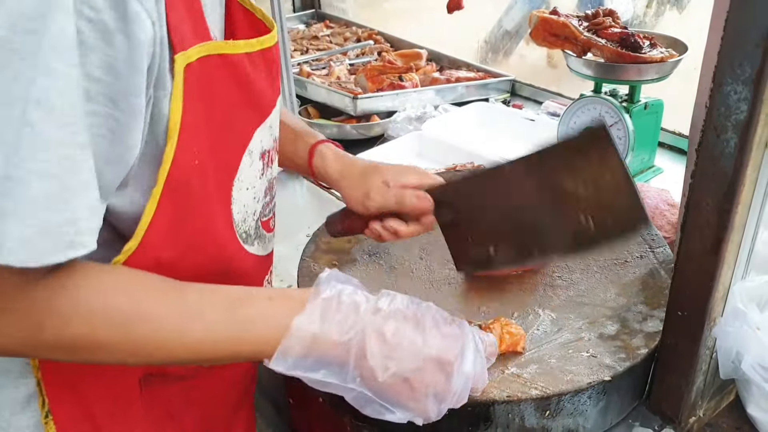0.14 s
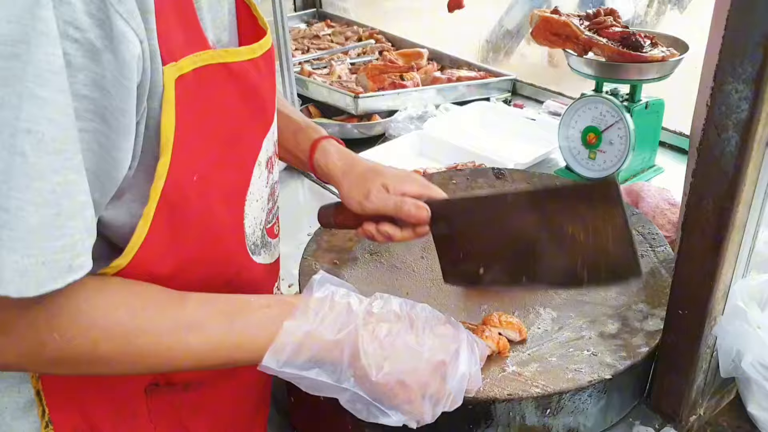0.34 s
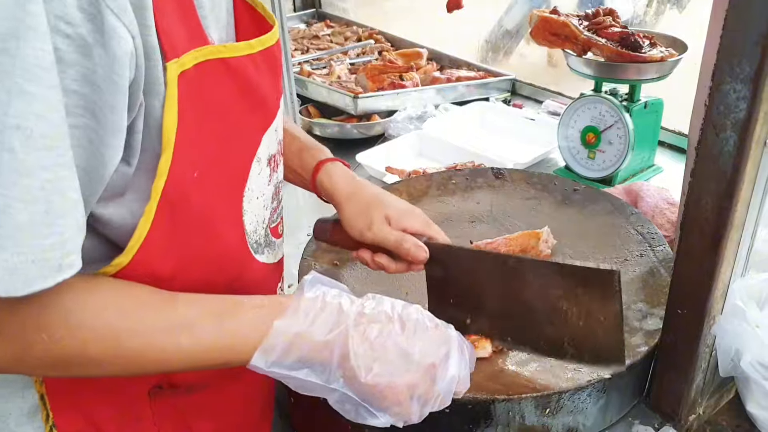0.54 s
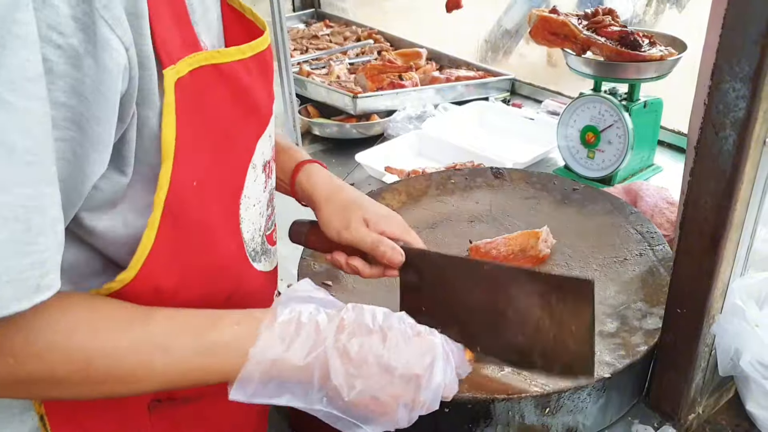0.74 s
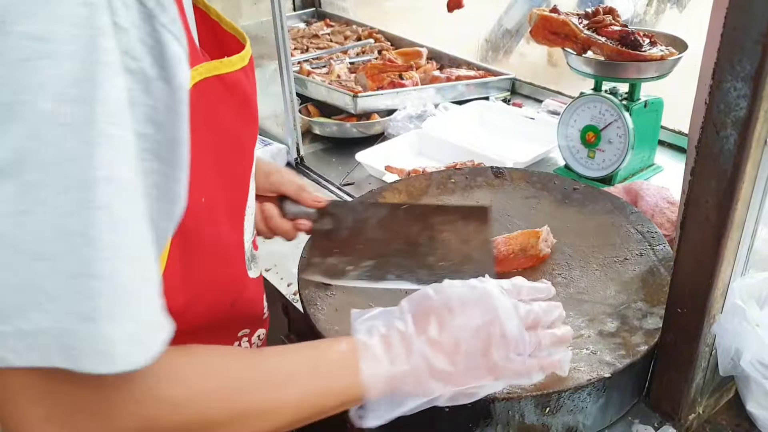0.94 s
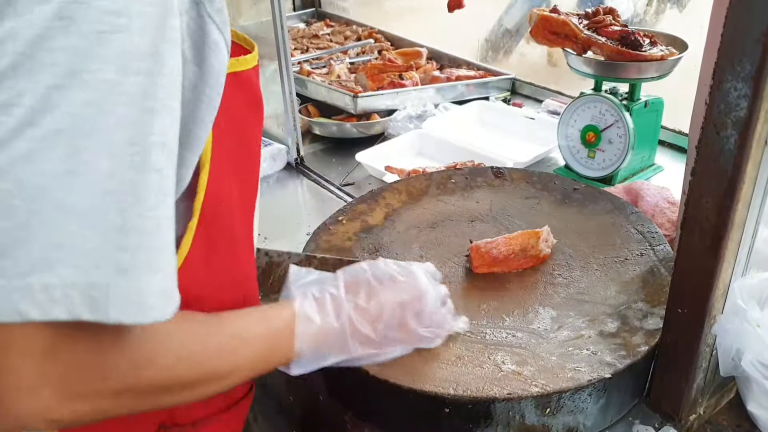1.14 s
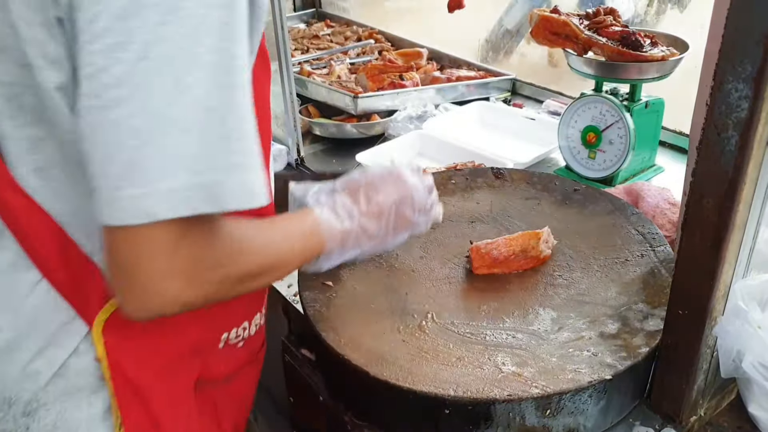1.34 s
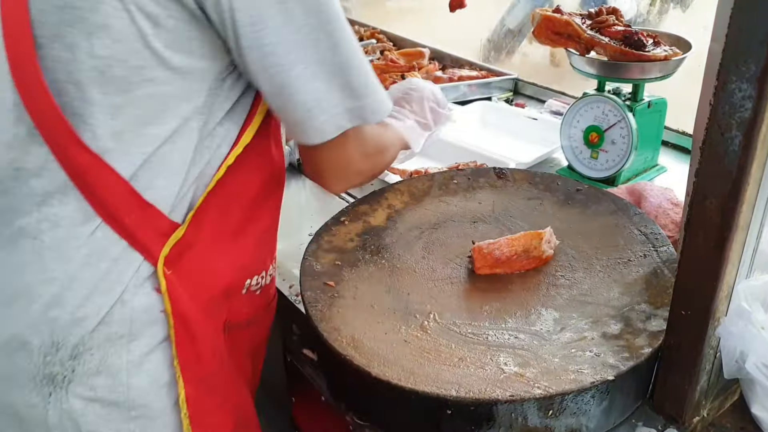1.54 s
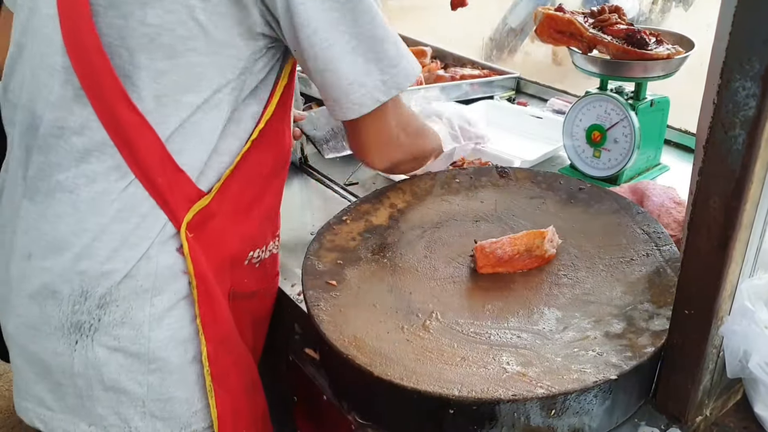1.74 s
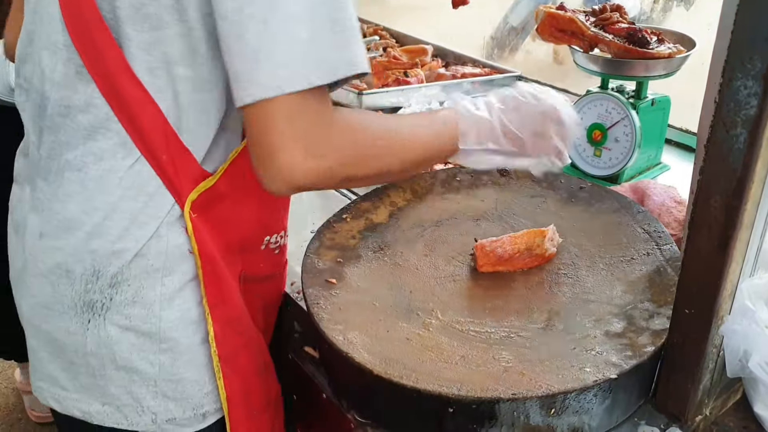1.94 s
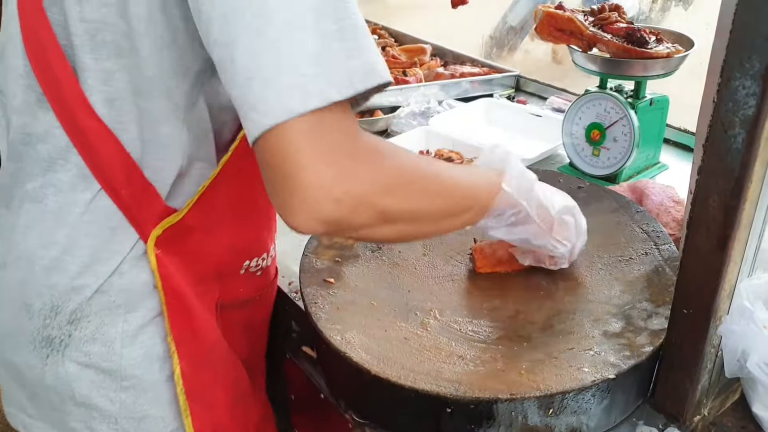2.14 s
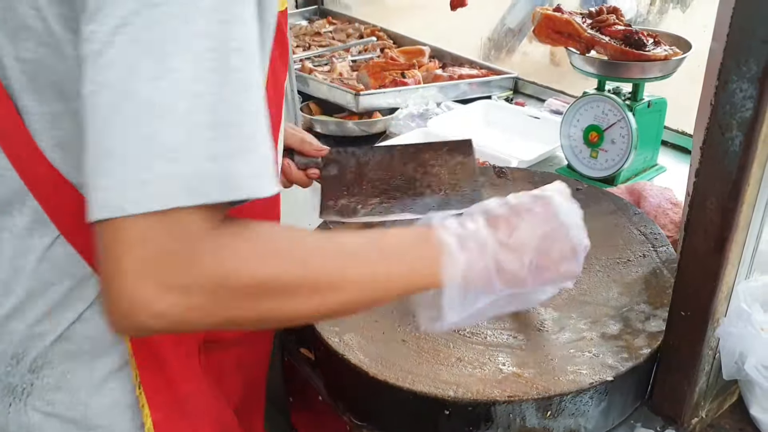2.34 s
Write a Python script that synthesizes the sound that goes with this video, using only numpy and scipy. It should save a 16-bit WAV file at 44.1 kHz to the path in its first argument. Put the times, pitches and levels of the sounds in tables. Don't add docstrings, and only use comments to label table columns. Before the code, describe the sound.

Three heavy cleaver chops thud through crackling meat on wood, followed by scraping and tray knocks

```python
import sys
import numpy as np
from scipy import signal
from scipy.fft import rfft, irfft, next_fast_len
from scipy.io import wavfile
from scipy.ndimage import uniform_filter1d, map_coordinates

SR = 44100
rng = np.random.default_rng(int(sys.argv[2]) if len(sys.argv) > 2 else 0)


def bounce(signal):
    frames = np.transpose(np.atleast_2d(signal))
    limited = np.clip(frames, -1, 1)
    pcm = np.round(limited * 32767).astype(np.int16)
    wavfile.write(sys.argv[1], SR, pcm)


def boost(x):
    u = np.asarray(x, float) / 20
    return 10 ** u


N = 110250
T = np.arange(N) / SR

# f/Hz, density/dB per Hz
HISS_SPECTRUM = [(150, -70), (250, -7), (800, -5.5), (2050, -7.5), (3400, -14.5), (6000, -16),
                 (9000, -20.5), (16000, -24.5)]
TRAFFIC_SPECTRUM = [(15, -39), (28, -7), (50, 2), (118, 3.5), (146, -7), (211, -11), (257, -14), (400, -28),
                    (880, -120)]
# t/s, level/dB
HISS_LEVEL = [(0.0, -47.5), (0.2, -53.5), (0.28, -34.5), (0.4, -43.5), (0.54, -43), (1.08, -49),
              (1.22, -49), (1.5, -50), (1.86, -47.5), (2.04, -50.5), (2.28, -51.5), (2.5, -49)]
# f/Hz, correlation/1
FAR_LIKENESS = [(60, 0.85), (240, 1), (950, -0.32), (3770, 0.045), (15000, -0.22)]
NEAR_LIKENESS = [(60, 1), (240, 0.85), (950, 0.67), (3770, -0.28), (15000, 0.45)]
# peak t/s, dull level/dB, crisp level/dB, rise/s, fall/s
RUSTLES = [(0.129, -51.5, -57, .067, 0.064), (0.929, -49, -49.5, 0.039, 0.02),
           (1.008, -50.5, -39.5, 0.024, 0.036), (1.08, -72, -52.5, 0.034, 0.036),
           (1.21, -48, -50.5, 0.2, 0.056), (1.5, -54, -61, 0.21, 0.048), (1.701, -44, -46.5, 0.032, 0.042),
           (1.79, -47.5, -62, 0.039, 0.025), (1.888, -53, -56, 0.012, 0.21),
           (2.153, -44, -47.5, 0.057, 0.056), (2.31, -57, -54, 0.045, 0.036),
           (2.395, -44, -54, 0.052, 0.045), (2.48, -48.5, -55, 0.023, 0.044)]
# t/s, level/dB
SNAPS = [(.984, -43), (1.004, -47), (1.015, -33.5), (1.036, -36), (1.069, -52.5), (1.425, -51),
         (1.487, -48), (2.265, -43), (2.27, -42), (2.279, -43), (2.287, -52), (2.317, -59), (2.47, -46)]
# f/Hz, density/dB per Hz
DULL_SPECTRUM = [(300, -31), (700, -7), (2000, -0.5), (3300, -6.5), (5000, -5), (7000, -14), (10000, -29),
                 (16000, -40)]
CRISP_SPECTRUM = [(1500, -61), (3500, 0), (5200, -2.5), (8000, -2.5), (12000, -4.5), (16000, -7)]
# peak t/s, level/dB, rise/s, fall/s
RUBS = [
    (0.931, -38.5, 0.012, 0.056),
    (1.069, -42.5, 0.08, 0.057),
    (1.62, -48, 0.18, 0.21),
    (2.119, -38.5, 0.055, 0.069),
    (2.209, -39.5, 0.043, 0.047),
    (2.309, -44.5, 0.056, 0.11),
]
# start t/s, length/s, f/Hz, level/dB
SQUEALS = [
    (.87, .22, 2160, -53),
    (1.62, .2, 2100, -58),
    (2.237, .07, 2200, -53),
    (2.215, .04, 4000, -58.5),
    (2.355, .055, 2300, -57),
]
# t/s, f/Hz, level/dB, t60/s
BUMPS = [
    (.08, 293.5, -39, 0.17),
    (.33, 630, -24, .15),
    (0.56, 151, -12, 0.14),
    (.6, 149, -40, 0.089),
    (.85, 130, -26, 0.13),
    (.92, 610, -26, 0.062),
    (1.685, 690, -33, 0.065),
    (2.47, 540, -42.5, .15),
]
# t/s, level/dB, chatter length/s, clank level/dB
KNOCKS = [
    (2.0746, -35, .0002, -7),
    (2.1012, -30, .002, -2),
    (2.1380, -31, .025, 1),
]
# f/Hz, t60/s, level/dB at knocks 1, 2, 3
TRAY_MODES = [(277, 0.14, -7, 3.5, -3), (645.5, 0.1, 3.5, 9, -6.5), (733, 0.069, -14, 0, 2.5),
              (967, 0.2, -3.5, -3, -4), (1452, 0.13, -7, -4.5, -4), (1645, 0.037, 1, -13, -1),
              (2250, 0.037, -22, -0.5, 0), (2510, 0.17, -12, -13, -2.5), (2765, 0.23, -4.5, -21, -7.5),
              (2930, 0.072, -28, -17, -7), (3144, 0.12, -25, -21, -15), (3970, 0.074, -31, -9, -4),
              (5390, .15, -34, -19, -16.5), (6250, 0.18, -32, -18.5, -32)]
# f/Hz, density/dB per Hz
CLANK_SPECTRUM = [(150, -23), (300, -35), (700, -3), (1500, 5), (3000, 10), (4500, -27), (7000, -27),
                  (16000, -46)]
# t/s, block level/dB, skin level/dB, tail level/dB, drum level/dB
CHOPS = [
    (.2340, -8, -24, -10, -14),
    (.4938, -3.5, -26.5, -8.5, -15),
    (.7288, -10.5, -17, -17, -19),
]
# f/Hz, t60/s, level/dB at chops 1, 2, 3
BLOCK_MODES = [(278, 0.095, 7.5, 3.5, 2), (408, 0.071, -5, -5, -33), (462, 0.17, -5, -24, -8),
               (559.5, 0.13, -1.5, 2.5, 7), (751, 0.14, -2.5, -30, -11), (958, 0.38, -47, -6, -14),
               (1190, 0.018, -7, 6.5, 5.5), (1515, 0.029, 1.5, 0, -3), (1665, 0.065, -13.5, -2.5, -12.5),
               (2194, 0.055, -24, -8.5, -11), (3030, 0.043, -23, -11.5, -36)]
# f/Hz, level/dB, t60/s
DRUM_MODES = [(68, -1.5, 0.37), (94, 4.5, 0.23), (128.4, -6.5, 0.54)]
BLADE_MODES = [(3870, 8, 0.015), (5260, 1, 0.037)]
# f/Hz, density/dB per Hz
SKIN_SPECTRUM = [(1180, -38), (2000, -16), (5160, -1), (7310, -6), (12700, -11), (13800, -5), (16000, -14)]
SLAP_SPECTRUM = [(100, -39), (200, -22), (300, -0.5), (600, 4.5), (1100, -8), (2000, -17), (5000, -25),
                 (16000, -39)]
SHAKE_SPECTRUM = [(35, -14), (70, -4), (125, -6), (190, -10), (250, -11.5), (600, -20.5), (1200, -26),
                  (16000, -55.5)]
# f/Hz, t60/s
SLAP_T60 = [(100, 0.22), (400, 0.23), (1500, 0.19), (5000, 0.23), (15000, 0.31)]
# f/Hz, level/dB
MIC_RESPONSE = [(4000, 0), (6300, 1.5), (8200, -4), (9500, -1.5), (11500, 3.5), (14000, -0.5), (16000, 0.5)]
MIC_LEAN = [(60, -3.5), (180, -4), (550, -1.5), (1650, -3.5), (4970, -7.5), (15000, 3.5)]

TRAFFIC_DB, SURGE_DB = -42.5, 1.5
SQUEAL_WAVER_HZ, SQUEAL_STUTTER_DB = 75, 3
CLICK_DB, CLANK_DB, CLANK_T60_S = 12, -0.5, 0.16
MUTED_S, MUTE_FALL_S = 2.178, .02
SETTLE_S, SETTLE_DB = 2.15, -26.5
FORCE_PEAK_S, FREE_RING_S, DAMP_FALL_S = .0018, .012, .007
DAMPED_SHARE = 0.28
DRUM_LAG_S, DRUM_RISE_S = .0005, .022
SHELL_HZ, SHELL_DB, SHELL_T60_S = 249.6, -9, 0.59
SKIN_RISE_S, SKIN_FALL_S, BLADE_DB = .0015, .0032, -7
SLAP_DB, SLAP_RISE_CYCLES = -1, 8
SHAKE_DB, SHAKE_T60_S = -12.5, 1.21


def unit(x):
    return x / np.sqrt(np.mean(x ** 2) + 1e-20)


def along(points, hz):
    f, v = np.transpose(points)
    return np.interp(np.log(hz + 1), np.log(f + 1), v)


def wobble(rate_hz):
    knots = rng.standard_normal(int(N * rate_hz / SR) + 4)
    return map_coordinates(knots, [T * rate_hz])


def filtered(x, response):
    m = next_fast_len(N + SR // 2)
    return irfft(rfft(x, m) * response(np.fft.rfftfreq(m, 1 / SR)), m)[..., :N]


def rush(spectrum, likeness, field=lambda hz, t: 1, patchy_db=0):
    def mid_side(hz):
        angle = np.arccos(np.clip(along(likeness, hz), -1, 1)) / 2
        return boost(along(spectrum, hz)) * np.array([np.cos(angle), np.sin(angle)])

    mid, side = filtered(rng.standard_normal((2, N)), mid_side)
    stereo = unit(np.array([mid + side, mid - side]))
    hz, t, z = signal.stft(stereo, SR, nperseg=128)
    patch = uniform_filter1d(rng.standard_normal(z.shape[1:]), size=3, axis=0)
    patch = unit(uniform_filter1d(patch, size=30, axis=1))
    z = z * field(hz[:, None], t) * boost(patchy_db * patch)
    return signal.istft(z, SR, nperseg=128)[1][:, :N]


def dying(t, t60_s, rise_s):
    t = np.maximum(t, 0)
    return (1 - np.exp(-t / rise_s)) * boost(-60 * t / t60_s)


def ring(start_s, modes, rise_s=0.00036, crest_s=None):
    t = T[:N - round(start_s * SR)]
    out = np.zeros(len(t))
    for hz, db, t60_s in modes:
        if crest_s is None:
            wave = np.sin(2 * np.pi * hz * t)
        else:
            wave = np.cos(2 * np.pi * hz * (t - crest_s))
        out += boost(db) * dying(t, t60_s, rise_s) * wave
    return np.pad(out, (N - len(t), 0))


def hump(peak_s, rise_s, fall_s):
    return np.exp(-((T - peak_s) / np.where(T < peak_s, rise_s, fall_s)) ** 2)


def hold(end_s, fall_s):
    return hump(end_s, 9, fall_s)


def street():
    hiss_db = np.interp(T, *np.transpose(HISS_LEVEL)) - 1.15
    hiss = boost(hiss_db) * rush(HISS_SPECTRUM, FAR_LIKENESS, patchy_db=0.04)
    traffic_db = TRAFFIC_DB + SURGE_DB * wobble(4.96)
    return hiss + boost(traffic_db) * rush(TRAFFIC_SPECTRUM, [(30, 1.0), (400, 0.64)])


def glove():
    dull = sum(boost(db) * hump(s, rise, fall) for s, db, _, rise, fall in RUSTLES)
    crisp = sum(boost(db) * hump(s, rise, fall) for s, _, db, rise, fall in RUSTLES)
    snaps = sum(boost(db) * hump(s, 0.00067, 0.0014) for s, db in SNAPS)
    crisp = crisp * boost(1.9 * wobble(250)) + snaps
    out = dull * rush(DULL_SPECTRUM, [(500, 0.096), (5000, 0.053)], patchy_db=1.0)
    return out + crisp * rush(CRISP_SPECTRUM, [(5000, 0.12)], patchy_db=2.0)


def scrapes():
    rubs = sum(boost(db) * hump(s, rise, fall) for s, db, rise, fall in RUBS)
    out = rubs * rush(SHAKE_SPECTRUM, NEAR_LIKENESS, patchy_db=3.0)
    for s, length_s, hz, db in SQUEALS:
        half_s = length_s / 2
        cycles = np.cumsum(hz + SQUEAL_WAVER_HZ * wobble(400)) / SR
        cycles = cycles + [[0], [.12]]
        gate = np.exp(-((T - s - half_s) / half_s) ** 6)
        out += boost(db + 3.5 + SQUEAL_STUTTER_DB * wobble(130)) * gate * np.sin(2 * np.pi * cycles)
    return out + sum(ring(s, [(hz, db, t60_s)], rise_s=0.006) for s, hz, db, t60_s in BUMPS)


def tray():
    out = np.zeros((2, N))
    clank = rush(CLANK_SPECTRUM, NEAR_LIKENESS, patchy_db=-1.5)
    for k, (s, db, chatter_s, clank_db) in enumerate(KNOCKS):
        chatter = (T > s) * np.exp(-((T - s) / chatter_s) ** 2)
        taps = chatter * rng.standard_normal(N) * (rng.random(N) < .03) * 0.18
        taps[round(s * SR)] = 1
        modes = [(hz, spots[k], t60_s) for hz, t60_s, *spots in TRAY_MODES]
        steel = ring(0, modes, rise_s=0.0002)[:SR // 3]
        click = boost(CLICK_DB) * hump(s + 0.0003, 0.0002, 0.00015)
        out += boost(db) * (signal.fftconvolve(taps, steel)[:N] - click)
        out += boost(db + clank_db + CLANK_DB) * dying(T - s, CLANK_T60_S, 0.0002) * clank

    def wall_echo(hz):
        delay = np.exp(-2j * np.pi * hz * [[.0031], [.0047]])
        return 0.21 * delay * np.clip(hz / 1500, 0, 1)

    steel = out * boost([[-1.5], [1.5]]) + filtered(out, wall_echo)
    settle = ring(SETTLE_S, [(94, 9, 0.14), (198.4, -1.5, 0.13)], rise_s=0.0076)
    return steel * hold(MUTED_S, MUTE_FALL_S) + boost(SETTLE_DB) * settle


def chops():
    out = hump(0.96, 0.074, 0.15) * boost(-46) * rush(SLAP_SPECTRUM, NEAR_LIKENESS, patchy_db=-2.0)
    for k, (s, block_db, skin_db, tail_db, drum_db) in enumerate(CHOPS):
        modes = [(hz, spots[k], t60_s) for hz, t60_s, *spots in BLOCK_MODES]
        wood = ring(s, modes, rise_s=0.0011, crest_s=FORCE_PEAK_S)
        damping = DAMPED_SHARE + (1 - DAMPED_SHARE) * hold(s + FREE_RING_S, DAMP_FALL_S)
        out += boost(block_db - 7.5) * wood * damping

        out -= boost(drum_db) * ring(s + DRUM_LAG_S, DRUM_MODES, rise_s=DRUM_RISE_S)
        shell = ring(s, [(SHELL_HZ, SHELL_DB, SHELL_T60_S)], rise_s=0.025)
        out += boost(drum_db + 3.7 * wobble(26.07)) * shell

        crack = hump(s - .0018, SKIN_RISE_S, SKIN_FALL_S) * rush(SKIN_SPECTRUM, [(3000, 0.11)])
        out += boost(skin_db) * crack
        blade = ring(s - .003, BLADE_MODES, rise_s=0.00088)
        out += boost(skin_db + BLADE_DB) * blade * boost([[1.5], [-6]])

        def slap_decay(hz, t):
            return dying(t - s, along(SLAP_T60, hz), SLAP_RISE_CYCLES / (hz + 200))

        slap = rush(SLAP_SPECTRUM, NEAR_LIKENESS, slap_decay, patchy_db=0.9) * (T > s)
        shake = rush(SHAKE_SPECTRUM, NEAR_LIKENESS, patchy_db=1.0)
        shake = shake * dying(T - s, SHAKE_T60_S, 0.0024) * boost(1.7 * wobble(40.2))
        out += boost(tail_db) * (boost(SLAP_DB) * slap + boost(SHAKE_DB) * shake)
    return out


def scene():
    return street() + glove() + scrapes() + tray() + chops()


def band_limit(x):
    return signal.sosfilt(signal.butter(12, 16660, fs=SR, output="sos"), x)


def record(dry):
    def ports(hz):
        db = along(MIC_RESPONSE, hz) + along(MIC_LEAN, hz) * [[.5], [-.5]]
        return boost(db) * (hz < 15900) * (hz > 20)

    x = filtered(dry, ports)
    x = x / (1 + np.abs(x / .95) ** 6) ** (1 / 6)
    return band_limit(x)


dry = scene()
out = record(dry)
bounce(out)
```